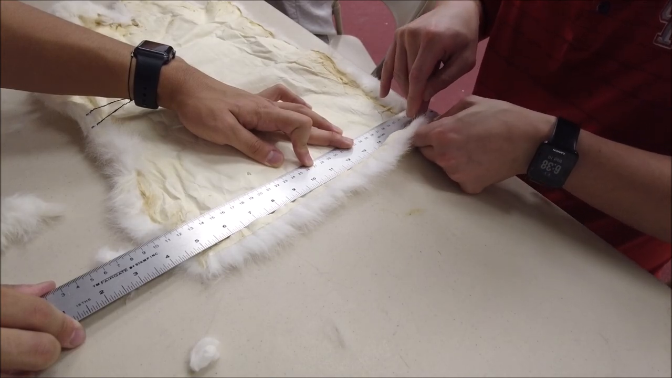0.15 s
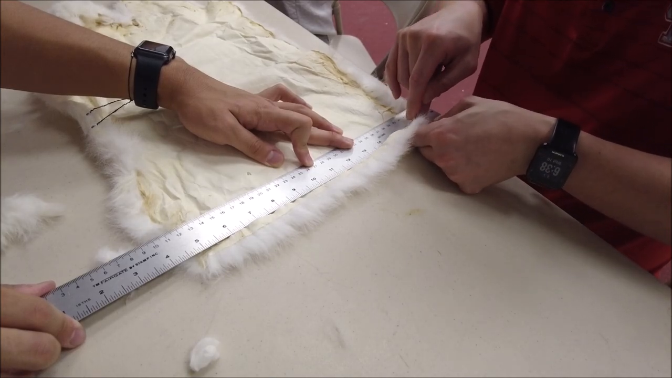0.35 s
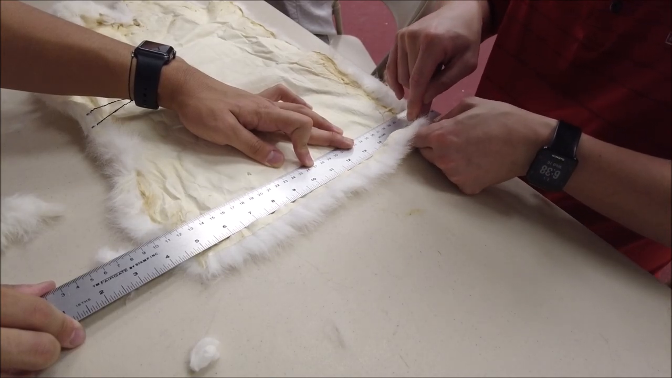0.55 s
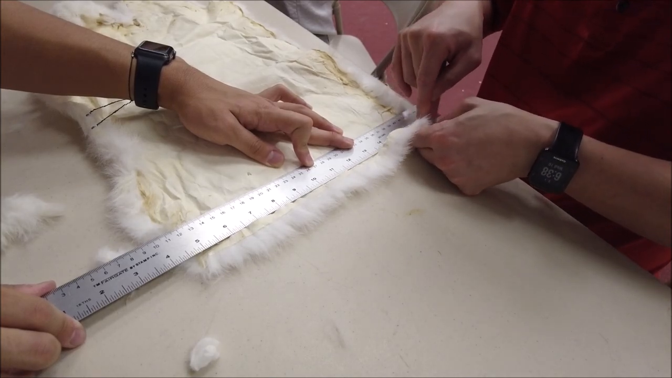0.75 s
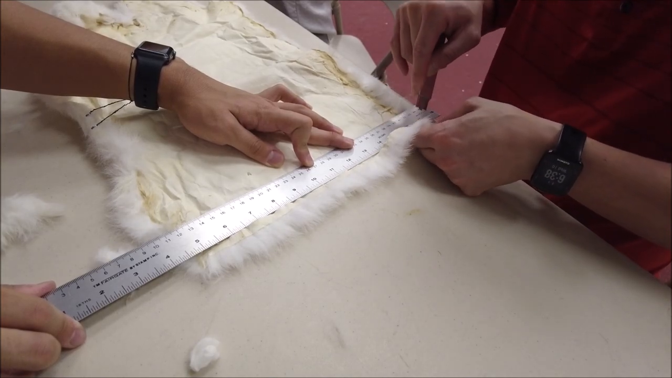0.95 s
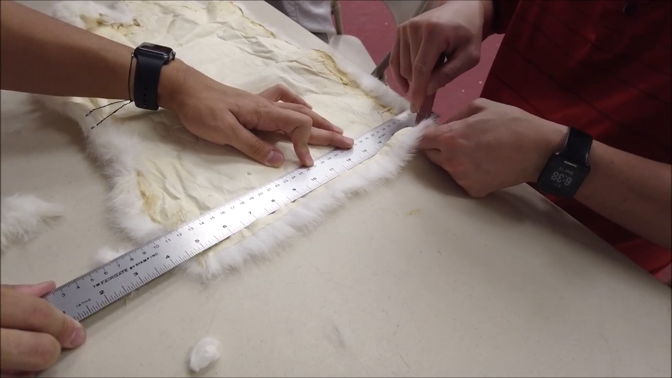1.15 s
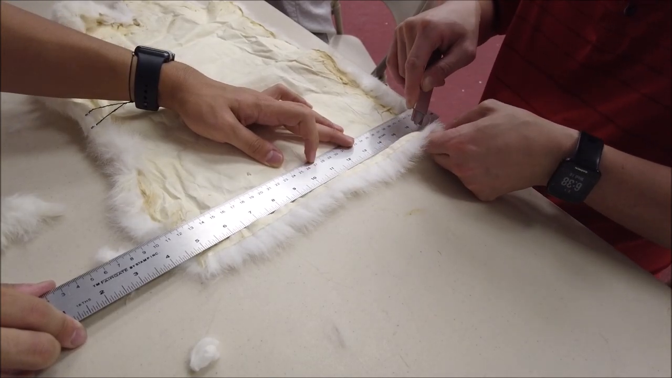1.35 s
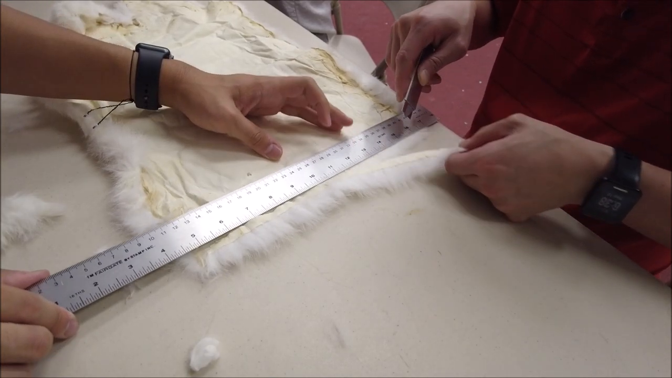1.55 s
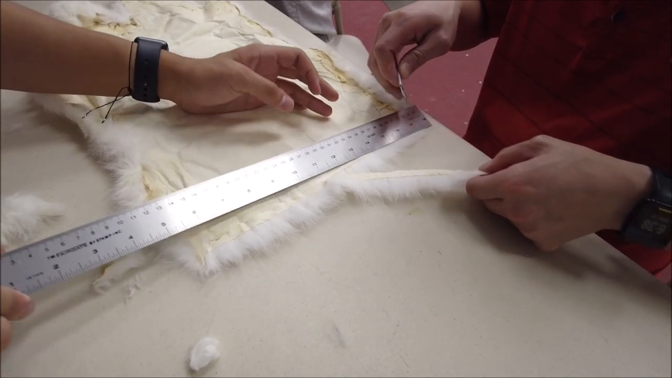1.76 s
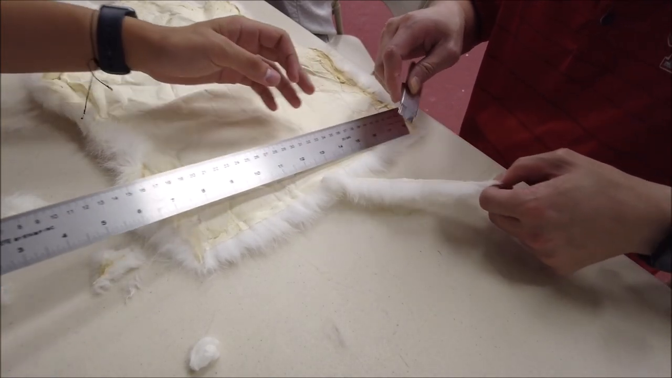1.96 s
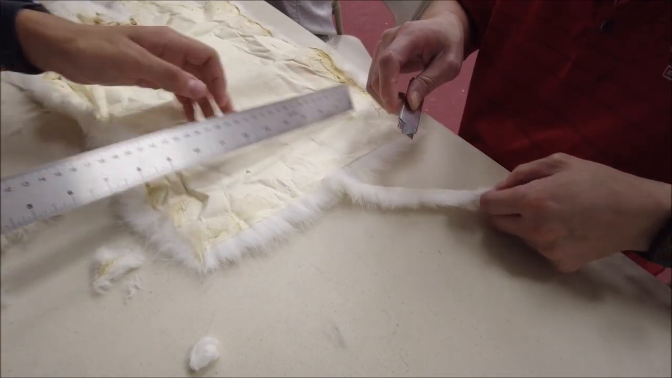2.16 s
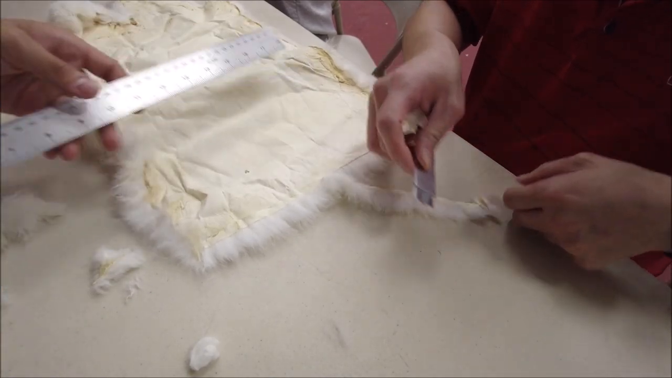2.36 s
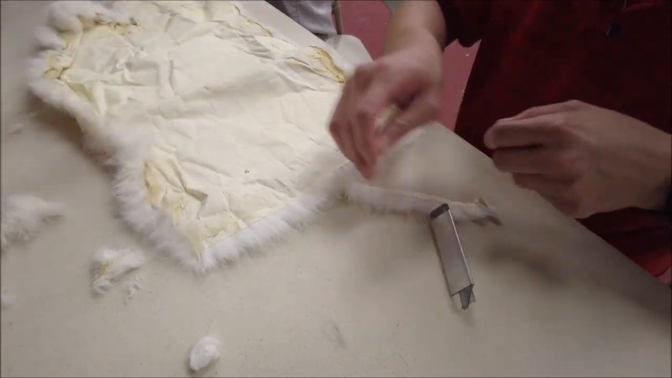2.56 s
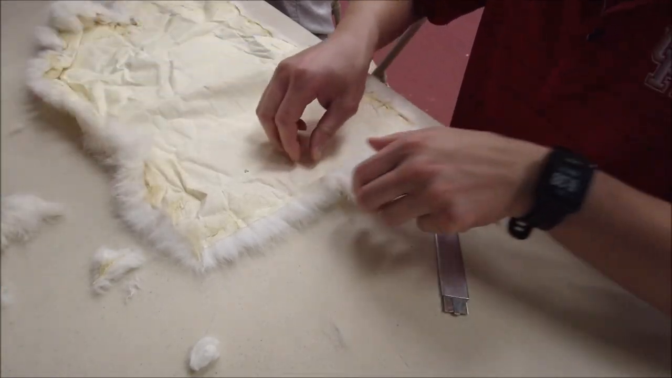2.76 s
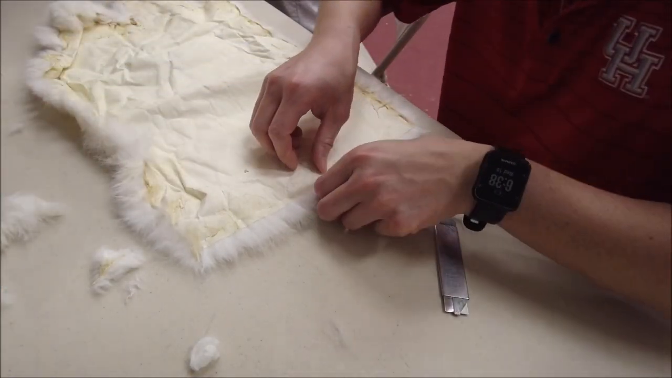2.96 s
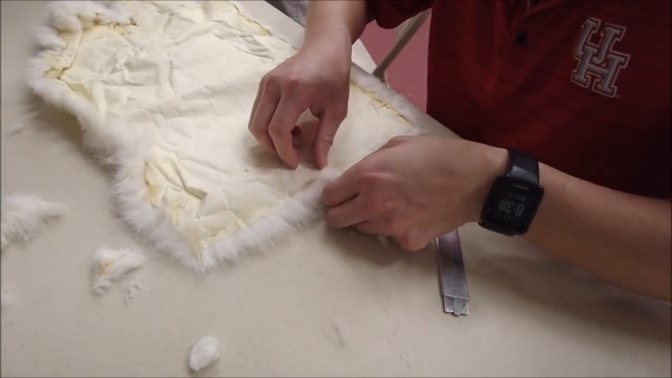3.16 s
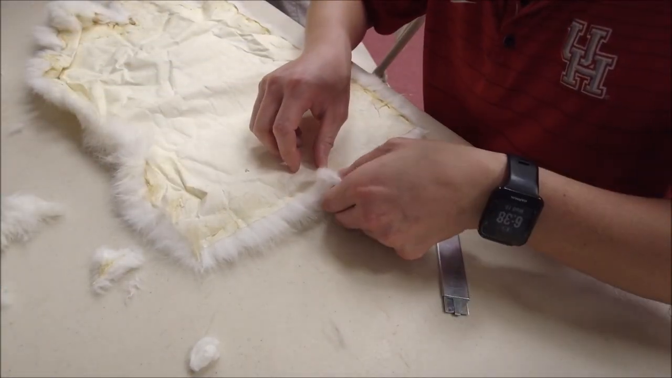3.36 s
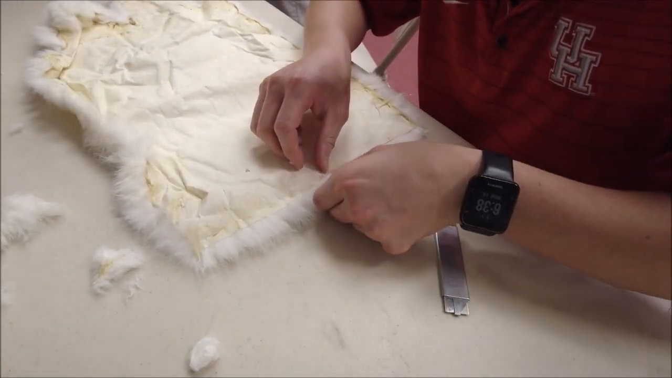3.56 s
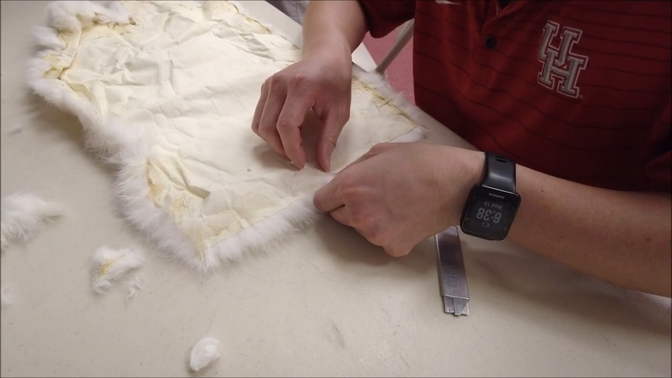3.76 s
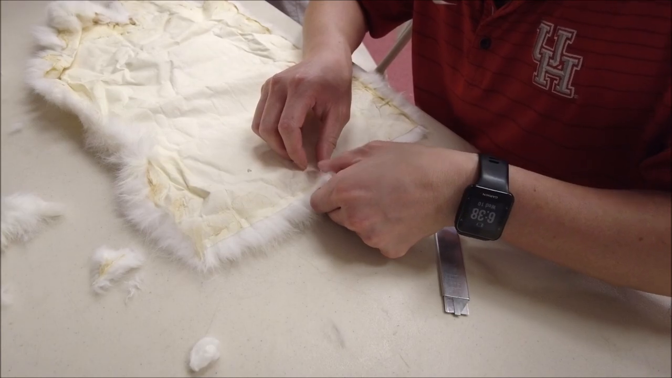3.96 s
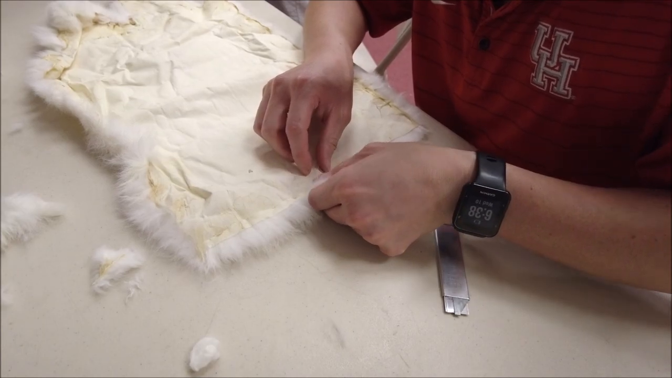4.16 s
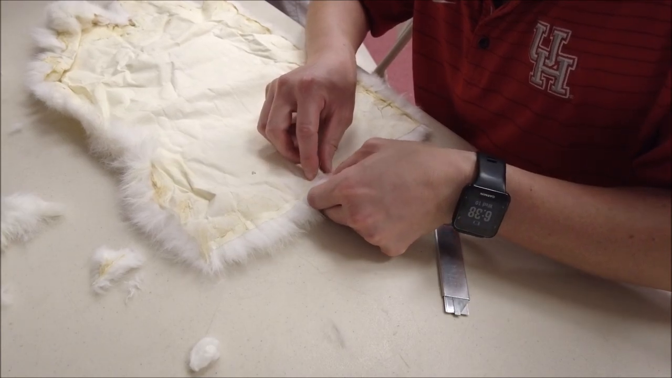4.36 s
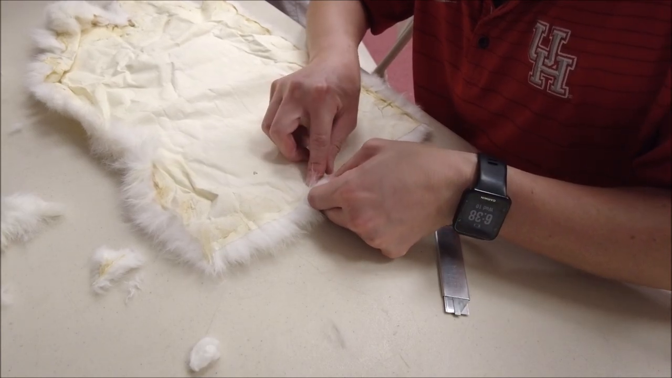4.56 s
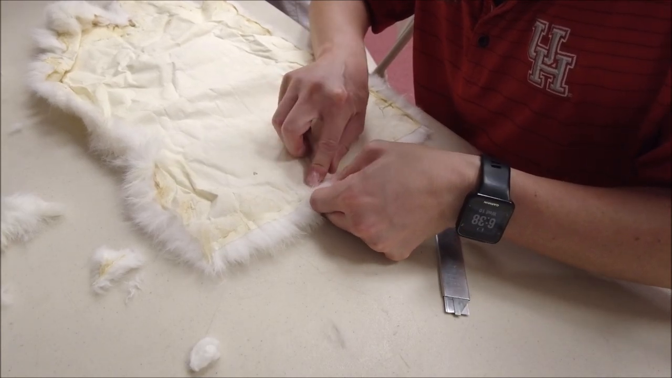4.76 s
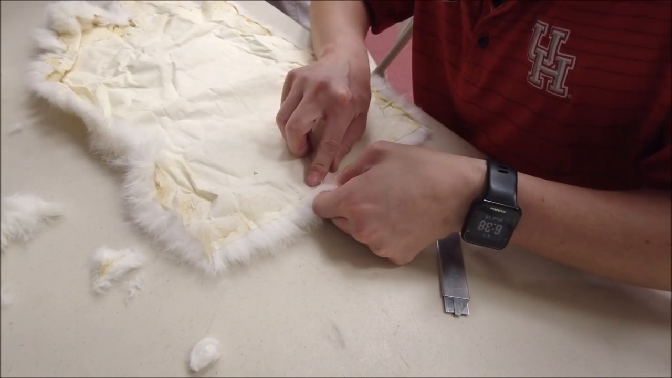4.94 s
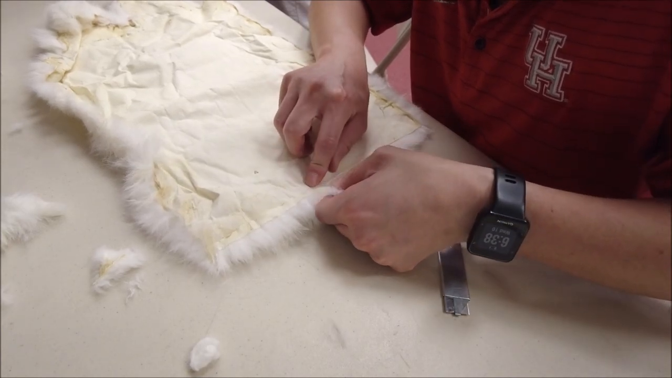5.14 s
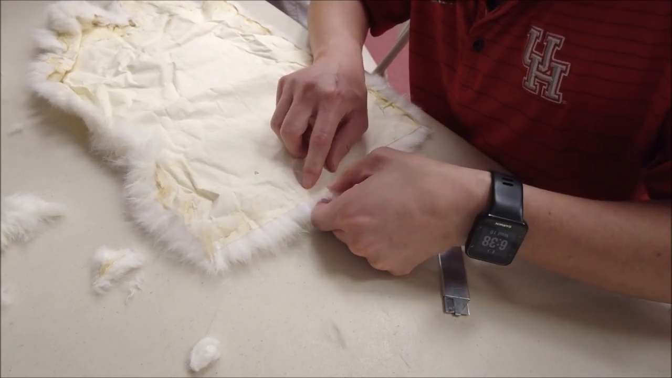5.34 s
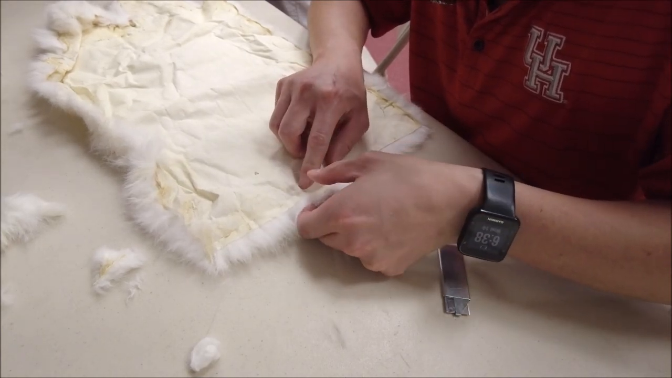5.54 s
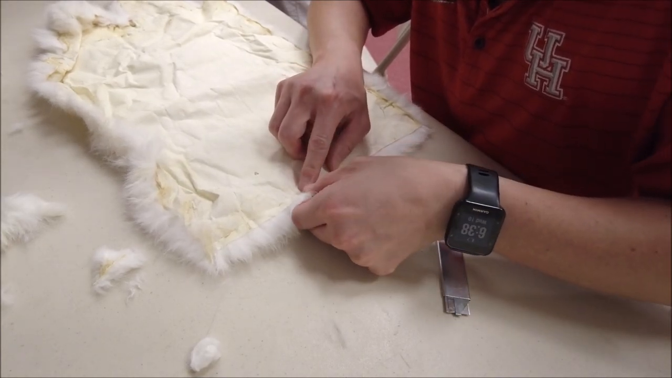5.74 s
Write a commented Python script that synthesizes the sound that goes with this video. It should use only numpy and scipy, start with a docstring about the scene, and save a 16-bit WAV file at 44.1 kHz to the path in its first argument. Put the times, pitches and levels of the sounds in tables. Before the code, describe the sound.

A blade scrapes along a steel ruler over fur, then clatters onto a table, over a low ventilation hum.

```python
"""At a work table in a ventilated room, a blade is drawn along a steel ruler over a fur hide.
It catches and slips, and each slip rings the ruler's edge. The ruler is slid away with a friction hiss,
and the knife is set down with a clatter that rings the table top. A sleeve sweeps past, a few light
knocks follow and fingers pluck at the fur. Underneath, the air rumbles and hums, a motor drone comes
and goes and three soft bumps are felt."""
import sys
import numpy as np
from scipy import signal
from scipy.fft import rfft, irfft, next_fast_len
from scipy.io import wavfile
from scipy.ndimage import uniform_filter1d, map_coordinates

SR = 44100
rng = np.random.default_rng(int(sys.argv[2]) if len(sys.argv) > 2 else 0)


def dump_mix(stems):
    """Bounce the given channels to the path in sys.argv[1] as a 16-bit WAV at rate SR."""
    frames = np.atleast_2d(stems).T  # one column per channel
    limited = np.clip(frames, -1, 1)  # hard clip at full scale
    pcm = np.round(limited * 32767).astype(np.int16)
    wavfile.write(sys.argv[1], SR, pcm)


N = 255772

# coherence of the room's sound field: f/Hz, left-right correlation
COHERENCE = [(60, 1), (180, 1), (550, 0.14), (1650, 0.38), (4970, 0.62), (15000, 0.48)]


def gain_of(db):
    """Amplitude ratio of a level in decibels."""
    return 10 ** (np.asarray(db) / 20)


def unit_rms(x):
    """Normalisation to rms 1."""
    return x / np.sqrt(np.mean(x ** 2) + 1e-20)


def curve_at(points, hz):
    """Interpolation of (f/Hz, value) points on a log-frequency axis."""
    f, value = np.transpose(points)
    return np.interp(np.log(hz + 1), np.log(f + 1), value)


def add(mix, start, sound):
    """Superposition of a sound on the mix, from start/s on."""
    part = mix[..., round(start * SR):][..., :sound.shape[-1]]
    part += sound[..., :part.shape[-1]]


def resonate(x, hz, width):
    """Damped resonator of bandwidth width/Hz; its peak gain is about 1 when narrow."""
    r, turn = np.exp(-np.pi * width / SR), np.cos(2 * np.pi * hz / SR)
    return 2 * (1 - r) * signal.lfilter([1, -r * turn], [1, -2 * r * turn, r * r], x)


def wander(rate_hz):
    """Random fluctuation of rms 1: a sum of sinusoids up to rate_hz."""
    t = np.arange(0, N + 256, 256) / SR
    rates = np.geomspace(rate_hz / 20, rate_hz, num=20)
    slow = sum(np.sin(2 * np.pi * (f * t + rng.random())) for f in rates)
    return np.interp(np.arange(N) / SR, t, unit_rms(slow))


def wavering_tone(hz, spread_hz):
    """A sinusoid of rms 1 under slow random frequency modulation."""
    return np.sqrt(2) * np.sin(2 * np.pi * np.cumsum(hz + spread_hz * wander(3.8)) / SR)


def patches(shape, bins, frames):
    """Moving averages turn noise into time-frequency patches of rms 1 (shape: bins x frames)."""
    noise = rng.standard_normal(shape[::-1]).T
    return unit_rms(uniform_filter1d(uniform_filter1d(noise, bins, axis=0), frames, axis=1))


def shaped_noise(db, hop, coherence):
    """Spectral synthesis of partly coherent stereo noise from levels db (bins x frames)."""
    a, b, c, d = rng.standard_normal(db.shape[::-1] + (4,)).T
    left, coherence = a + 1j * b, coherence[:, None]
    right = coherence * left + np.sqrt(1 - coherence ** 2) * (c + 1j * d)
    spectra = np.array([left, right]) * gain_of(db)
    return signal.istft(spectra, nperseg=4 * hop, noverlap=3 * hop)[1][:, :N]


def stroke(t, start, peak, end, rise, fall):
    """Power-law envelope of one movement: it swells to 1 and dies away."""
    up = np.clip((t - start) / (peak - start), 0, 1)
    down = np.clip((end - t) / (end - peak), 0, 1)
    return up ** rise * down ** fall


def room(x):
    """Reverberation: sparse random reflections, whose treble the walls absorb soonest."""
    decay = [(122, 1, 3.5), (500, 0.7, -1.5), (1480, 0.68, -3.5), (4000, 0.62, -4), (12000, 0.5, -6)]  # f/Hz, T60/s, relative level/dB
    f, t60, colour_db = np.transpose(decay)
    taps = np.zeros((2, SR))
    at = np.arange(300, SR - 20, 20) + rng.integers(0, 20, (2, (SR - 301) // 20))
    strengths = rng.choice([-1., 1.], at.shape) * gain_of(3.06 * rng.exponential(1, at.shape))
    np.put_along_axis(taps, at, strengths, axis=1)
    hz, t, spectra = signal.stft(taps, SR, nperseg=256)
    hz = hz[:, None]
    coherence = curve_at(COHERENCE, hz)  # long waves reach both sides alike
    spectra[1] = coherence * spectra[0] + np.sqrt(1 - coherence ** 2) * spectra[1]
    spectra *= gain_of(curve_at(np.c_[f, colour_db], hz) - 60 * t / curve_at(np.c_[f, t60], hz))
    spectra *= 1 + gain_of(10.5 - 60 * t / 0.077)  # nearby surfaces crowd the first moments
    tail = signal.istft(spectra, SR, nperseg=256)[1]
    return signal.fftconvolve(x[None], tail / np.linalg.norm(tail[0]), axes=1)[:, :N]


def ventilation():
    """Broadband rumble with a drifting spectrum, plus a hum of wavering partials."""
    spectrum = [(12, -32.5), (20, 2.5), (77, -8), (98, -19), (146, -15), (210, -22), (234, -22), (347, -23),
                (388, -24.5), (607, -33), (698, -34), (1080, -45), (1250, -40), (1660, -40), (1860, -47.5),
                (16000, -59.5)]  # f/Hz, relative spectral density/dB
    partials = [(96.5, -63.5), (142, -63), (189, -67.5), (236.5, -67)]  # f/Hz, level/dB
    hz = np.fft.rfftfreq(2048, 1 / SR)
    shape_db = curve_at(spectrum, hz)[:, None] + 1.4 * patches((len(hz), N // 512 + 5), 12, 8)
    rumble = gain_of(-46) * unit_rms(shaped_noise(shape_db, 512, curve_at(COHERENCE, hz)))
    hum = sum(gain_of(db + 2.8 * wander(7.5)) * wavering_tone(f, .8) for f, db in partials)
    return rumble + hum


def motor():
    """A motor's single spectral line comes and goes by slow amplitude modulation."""
    envelope = [(0, -75), (1, -64), (1.2, -47.5), (1.7, -47.5), (2.5, -53), (2.9, -56.5), (3.2, -64.5),
                (4.2, -86), (5.8, -53.5)]  # t/s, level/dB
    level_db = np.interp(np.arange(N) / SR, *np.transpose(envelope))
    return gain_of(level_db) * wavering_tone(hz=71.5, spread_hz=1.0)


def bumps():
    """Structure-borne sound: soft bumps arrive through the stand as low tone bursts."""
    bursts = [(5.36, -27.5, 35.2, 0.13), (2.62, -35, 42, .2), (0.66, -40, 42.6, 0.27)]  # t/s, peak level/dB, f/Hz, duration/s
    track = np.zeros(N)
    for start, db, f, length in bursts:
        t = np.arange(0, length, 1 / SR)
        add(track, start, gain_of(db) * np.sin(np.pi * t / length) ** 0.52 * np.sin(2 * np.pi * f * t))
    return track


def fur_rustle():
    """Friction noise of fibres, flickering as the fingers catch; incoherent strokes add in power."""
    strokes = [(.17, .48, .6, -87, -4), (.82, .855, .93, -86, -1), (1.35, 1.91, 1.96, -85, -3),
               (2.24, 2.256, 2.46, -86, -1), (2.36, 2.52, 2.56, -87, 3), (2.95, 3.3, 3.45, -84, -1.5),
               (3.4, 3.55, 3.95, -87.5, -3.5), (3.77, 3.79, 3.83, -82, -2), (3.82, 3.85, 4.0, -72.5, -3),
               (3.96, 4.04, 4.14, -86, -3), (4.08, 4.36, 4.75, -88, -4.5), (4.44, 4.485, 4.54, -83, -2),
               (4.56, 4.6, 4.76, -85, -4), (4.69, 4.715, 5.15, -84, -4.5), (4.76, 4.8, 5.0, -79.5, .5),
               (4.85, 5.1, 5.42, -87, -5), (5.38, 5.47, 5.54, -84, -4.5), (5.25, 5.45, 5.78, -89, -3)]  # start t/s, peak t/s, end t/s, level/dB, tilt/(dB per octave)
    hide_peaks = [(1450, 1.5), (2850, 2.5), (4200, 4)]  # f/Hz, boost/dB
    hz, t = np.fft.rfftfreq(256, 1 / SR), np.arange(N // 64 + 5) * 64 / SR
    octave = np.log2(np.maximum(hz, 700) / 7000)[:, None]
    power = sum((gain_of(db + tilt * octave) * stroke(t, *times, rise=.6, fall=1.1)) ** 2
                for *times, db, tilt in strokes)
    flicker = unit_rms(uniform_filter1d(rng.standard_normal(len(t)), size=5))
    colour_db = sum(db * np.exp(-((hz - f) / 250) ** 2) for f, db in hide_peaks) - 14 * (hz < 900)
    shape_db = colour_db[:, None] + 0.5 * flicker + 2.3 * patches(power.shape, bins=9, frames=40)
    return shaped_noise(shape_db + 10 * np.log10(power + 1e-20), 64, np.full(len(hz), .5))


def sleeve_sweep():
    """Interference of a sleeve's hiss with its table-top reflection: a comb widening as the arm sinks."""
    pushes = [(2.86, 3.06, 3.26, -53), (3.14, 3.28, 3.37, -58)]  # start t/s, peak t/s, end t/s, level/dB
    t = np.arange(pushes[0][0], pushes[-1][2], 1 / SR)
    power = sum((gain_of(db) * stroke(t, *times, rise=1.1, fall=.9)) ** 2 for *times, db in pushes)
    comb_hz = np.maximum(4350 + 12000 * (t - pushes[0][1]), 3300)
    highpass = signal.butter(2, 6500, "high", fs=SR, output="sos")
    hiss = signal.sosfilt(highpass, rng.standard_normal((N, 2)).T[:, :len(t)])
    hiss[1] = 0.2 * hiss[0] + 0.66 * hiss[1]
    delayed = np.arange(len(t)) - SR / comb_hz
    reflection = np.array([map_coordinates(side, [delayed], order=3) for side in hiss])
    flutter = gain_of(1.5 * wander(60)[:len(t)])
    return t[0], np.sqrt(power) * flutter * unit_rms(hiss + .45 * reflection)


def ruler_slide():
    """Forced vibration: steel-on-steel friction drives the ruler's resonances and a thin whistle."""
    strokes = [(1.97, 2.06, 2.1, -71, -80), (2.055, 2.16, 2.185, -56, -76), (2.245, 2.254, 2.36, -56, -74),
               (2.29, 2.5, 2.57, -69, -70)]  # start t/s, peak t/s, end t/s, level/dB, whistle level/dB
    modes = [(4500, 320, -3), (5600, 1700, 0)]  # f/Hz, bandwidth/Hz, relative level/dB
    t = np.arange(strokes[0][0], strokes[-1][2], 1 / SR)
    ring_gain, whistle_gain = sum(gain_of(row[3:])[:, None] * stroke(t, *row[:3], rise=.6, fall=1.3)
                                  for row in strokes)
    friction = rng.standard_normal((N, 2)).T[:, :len(t)] * gain_of(2.5 * wander(300)[:len(t)])
    friction[1] = 0.504 * friction[0] + 0.77 * friction[1]
    driven = lambda hz, width: unit_rms(resonate(resonate(friction, hz, width), hz, width))
    rings = sum(gain_of(db) * driven(f, width) for f, width, db in modes)
    rings = signal.sosfilt(signal.butter(6, 4200, "high", fs=SR, output="sos"), rings)
    body = gain_of(-9.5) * unit_rms(resonate(friction, hz=2500, width=900))
    return t[0], ring_gain * unit_rms(rings + body) + whistle_gain * driven(hz=12200, width=600)


def blade_skips():
    """Stick-slip: each slip of the blade is an impulse into the modes of the ruler's edge."""
    slips = [.197, .212, .227, .238, .248, .266, .283, .301, .315, .325, .335, .347, .357, .368, .382, .393,
             .418, .43, .459]  # t/s
    edge_modes = [(1890, 250, -8), (3330, 230, 0), (5930, 300, -6), (8000, 600, -12)]  # f/Hz, bandwidth/Hz, relative level/dB
    times, clicks = np.array(slips), np.zeros(N)
    level_db = -47.5 + 2 * rng.standard_normal(len(times)) - 20 * (times - times[0])
    clicks[np.round(times * SR).astype(int)] = gain_of(level_db)
    rings = sum(gain_of(db) * resonate(clicks, f, width) * SR / (2 * np.pi * width)
                for f, width, db in edge_modes)
    return gain_of(-6) * rings + gain_of(-9) * clicks


def impacts():
    """Impact excitation: a tick and a dying burst in four bands; the lower two ring the table top."""
    # t/s, clack, thud, knock and snap level/dB, left-right/dB, room send/dB, clack, thud and knock f/Hz
    contacts = [(0.3995, -47, -52.5, -50, -65, -0.5, -17, 3000, 750, 1060),
                (0.444, -43, -63, -55, -63, -2, -9, 5500, 200, 1260),
                (0.4863, -41.5, -61, -48, -50, -2, -7, 2800, 240, 2170),
                (0.657, -60, -69, -52.5, -77, -1, -10, 5500, 200, 1710),
                (0.7402, -35, -40, -43, -46, -5, -11, 6100, 720, 1400),
                (0.7444, -30, -46, -52, -41, 5, -17, 5300, 210, 900),
                (0.7755, -36, -37, -33, -44, -2.5, -17, 4400, 780, 1410),
                (0.7862, -38.5, -34.5, -52, -35, 0.5, -17, 4400, 130, 800),
                (0.8245, -41, -39, -45, -51, -2, -12, 4260, 140, 1600),
                (0.8602, -48, -52, -71, -62, -2, -9, 5800, 330, 900),
                (1.1845, -37, -28, -31, -56, 1, -3, 3120, 210, 800),
                (1.2239, -48, -38, -39, -85, -3, 4, 2890, 780, 1450),
                (1.254, -50, -40, -40, -85, 1, 2.5, 3000, 750, 1010),
                (1.3258, -38, -21, -29, -54, 0.5, -5, 3100, 370, 1250),
                (1.4562, -48, -60, -56, -85, -1.5, -12, 3680, 260, 1230),
                (1.8477, -56, -55, -50, -52, 2, -15.5, 2690, 290, 1560),
                (2.2802, -52, -46, -54, -66, 0, -13, 2300, 230, 2100),
                (2.378, -47.5, -74, -63, -70, 1.5, -11, 3400, 230, 1450),
                (2.5664, -16, -18, -14.5, -29, -4, -10, 3500, 312, 982),
                (2.5813, -18, -19.5, -16.5, -19, -2, -10.5, 6300, 312, 1650),
                (2.584, -10, -17, -22, -20, 3, -11.5, 4330, 318, 1650),
                (2.5921, -11, -27, -12, -14, -3.5, -15.5, 3100, 312, 993),
                (2.6099, -47, -19, -35, -54, 2, -13, 2400, 299, 999),
                (2.634, -22.5, -28, -22, -33, -2, -10, 3400, 700, 1150),
                (2.6586, -31, -21, -25, -56, -1.0, -4.5, 2650, 307, 964),
                (2.7164, -33, -15.5, -26, -43, 0.5, -7, 3440, 630, 1450),
                (2.724, -38, -30, -34, -44, 0, 2, 5500, 700, 1250),
                (2.7391, -24, -22.5, -30, -36, -3, -9, 6220, 160, 800),
                (2.755, -31, -30, -38, -40, 7, -19, 6120, 240, 800),
                (2.7716, -24, -32, -28, -29, -8, -6, 2900, 608, 1050),
                (2.7827, -44, -30, -21, -52, -3, -8.5, 2900, 412, 1100),
                (2.7899, -28, -30, -41, -34, 3, -7, 4200, 248, 1070),
                (2.8066, -22, -26, -27, -29, -2, -9, 5200, 660, 988),
                (2.8329, -38, -34, -40, -44, 3, -6.5, 6200, 315, 1180),
                (2.9049, -46, -45, -33, -56, 0.0, -6, 2480, 283, 991),
                (3.1936, -49.5, -65, -57.5, -60, -1, -9, 4000, 290, 930),
                (3.4985, -56, -39, -48, -60, 6, -6, 2300, 708, 1450),
                (3.8234, -29, -35, -30, -17, 4.5, -12, 2900, 440, 1450),
                (3.8443, -42, -43, -36, -37, -6.5, -12, 4500, 440, 1100),
                (4.0103, -47, -52, -49, -78, 1, -8, 2730, 780, 1290),
                (4.029, -53, -62, -62, -78, 1, -10, 3200, 300, 1300),
                (4.0623, -30, -29, -33, -31, 5.5, -9, 2860, 250, 1490),
                (4.0843, -52, -33, -44, -45, -6, -9, 5960, 150, 1000),
                (4.557, -52, -70, -50, -80, 2, -15, 2300, 315, 1850)]
    table_modes = [(144.2, 1, 0.42), (275, -2.5, 0.2), (307, -1, 0.15), (390, -6, 0.21), (500, -11, 0.06),
                   (678, -9.5, 0.14), (1000, -8, 0.1), (1180, -2, 0.035), (1650, -9, 0.025)]  # f/Hz, relative level/dB, T60/s
    # one entry per band, in the order clack, thud, knock, snap:
    band_edges = [(2000, 6500), (80, 800), (800, 1900), (6500, 16000)]  # lower f/Hz, upper f/Hz
    rise_times = [0.0011, 0.006, 0.002, 0.0004]  # t/s
    linger = [0.55, 3.4, 1.5, 0.5]  # factor on the decay time: bass outlasts treble
    coherence = [0.75, 0.9, 0.69, 0.85]  # left-right correlation
    ticks = [2.2, 5, 4.5, 2.2]  # amplitude of the first touch against the burst
    note_q = [4, 4.5, 6, 9]  # quality factor of the struck spot's note
    note_gain = [2.5, 2.8, 2.6, 1.1]  # strength of that note
    note_share = np.array([[1], [1], [.55]])  # its weight in the left, right and room signals
    snap_hz = 7900  # the steel's note
    treble, blows = np.zeros((2, 3, N))
    t = np.arange(round(.16 * SR)) / SR
    bands = [signal.butter(3, edges, "band", fs=SR, output="sos") for edges in band_edges]
    for start, *levels_db, pan_db, room_db, clack_hz, thud_hz, knock_hz in contacts:
        t60 = .021 + .0004 * (max(levels_db) + 40)  # harder blows last longer
        common, separate = rng.standard_normal(len(t)), rng.standard_normal((3, len(t)))
        chatter = gain_of(3.6 * unit_rms(uniform_filter1d(rng.standard_normal(len(t)), size=60)))
        sends = gain_of([[pan_db / 2], [-pan_db / 2], [room_db]])
        for k, note_hz in enumerate((clack_hz, thud_hz, knock_hz, snap_hz)):
            envelope = (1 - np.exp(-t / rise_times[k])) * gain_of(-60 * t / (t60 * linger[k]))
            noise = coherence[k] * common + np.sqrt(1 - coherence[k] ** 2) * separate
            drive = noise * envelope * (chatter if k != 1 else 1)  # the thud does not chatter
            drive[:, round(min(rise_times[k], .002) * SR)] += ticks[k]
            burst = signal.sosfilt(bands[k], resonate(drive, 8000, 14000))  # the top octave is soft
            burst += note_gain[k] * note_share * resonate(burst, note_hz, note_hz / note_q[k])
            burst *= gain_of(levels_db[k]) * sends / abs(burst).max()
            add(blows if k in (1, 2) else treble, start, burst)
    rings = sum(gain_of(db) * resonate(blows, f, np.log(1000) / np.pi / t60)
                for f, db, t60 in table_modes)
    left, right, send = treble + gain_of(1.5) * blows + gain_of(3.5) * rings
    return np.array([left, right]) + gain_of(1.8) * room(send)


def scene():
    """Superposition of the sounds on the table, their reverberation and the background."""
    blade = blade_skips()
    mix = impacts() + blade + gain_of(-12) * room(blade)
    mix += fur_rustle() + ventilation() + motor() + bumps()
    add(mix, *ruler_slide())
    add(mix, *sleeve_sweep())
    return mix


def record(dry):
    """Two spaced microphone ports receive unequal level and phase; a low-pass ends the band at 16 kHz."""
    balance = [(25, 2.5), (60, 0.2), (950, 1.0), (15000, 0.5)]  # f/Hz, left-right level/dB
    phase_lead = [(400, 0.33), (3900, 0), (6600, 1.24), (9400, -1.9), (16000, -1.5)]  # f/Hz, lead of the left port/rad
    size = next_fast_len(N)
    hz, side = np.fft.rfftfreq(size, 1 / SR), np.array([[.5], [-.5]])
    ports = gain_of(side * curve_at(balance, hz)) * np.exp(1j * side * curve_at(phase_lead, hz))
    heard = irfft(rfft(dry, size) * ports, size)[:, :N]
    lowpass = signal.firwin(511, 16000, window=("kaiser", 9), fs=SR)
    return signal.oaconvolve(heard, lowpass[None], "same")


dry = scene()
out = record(dry)
dump_mix(out)
```